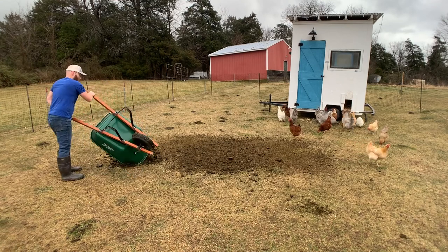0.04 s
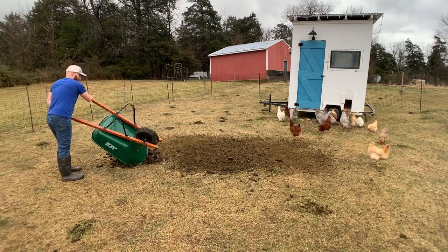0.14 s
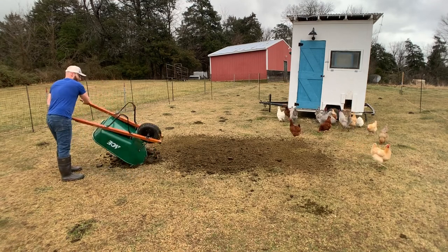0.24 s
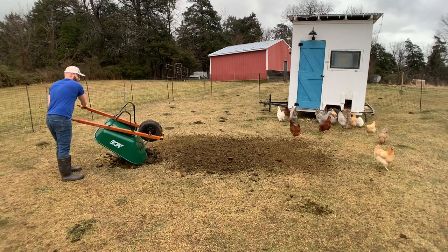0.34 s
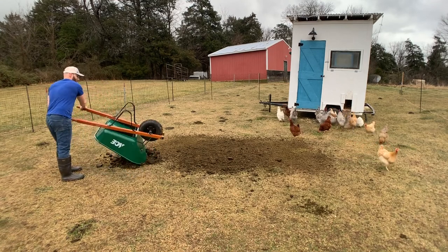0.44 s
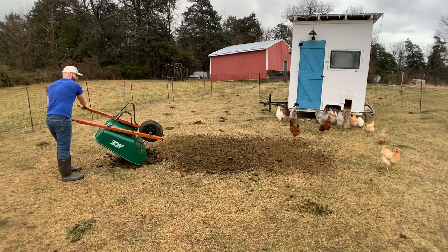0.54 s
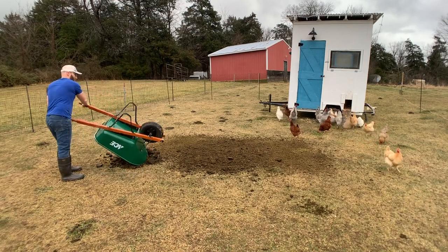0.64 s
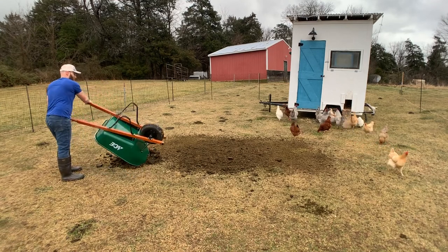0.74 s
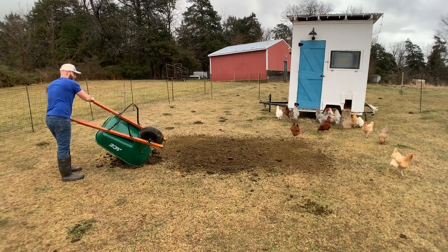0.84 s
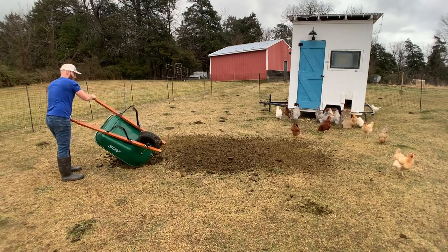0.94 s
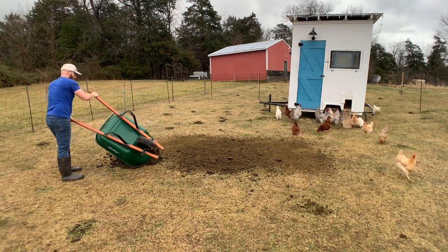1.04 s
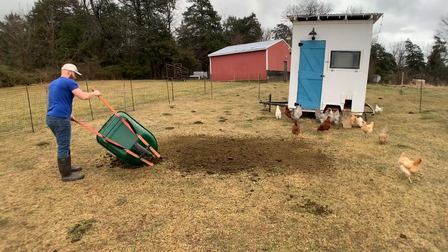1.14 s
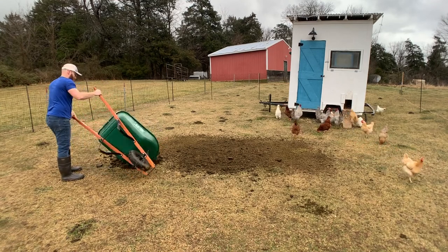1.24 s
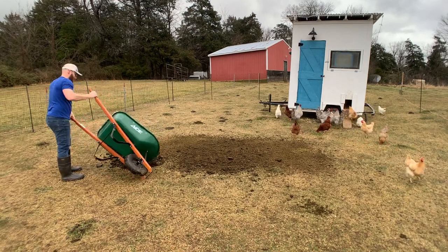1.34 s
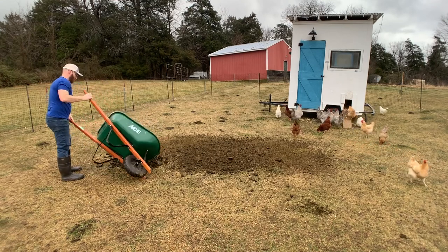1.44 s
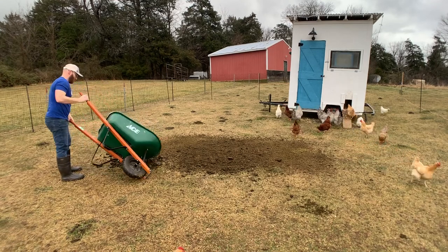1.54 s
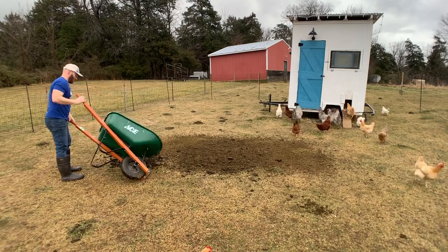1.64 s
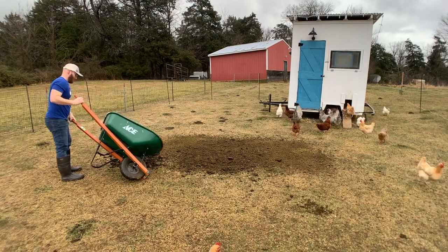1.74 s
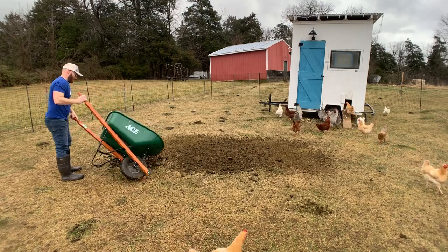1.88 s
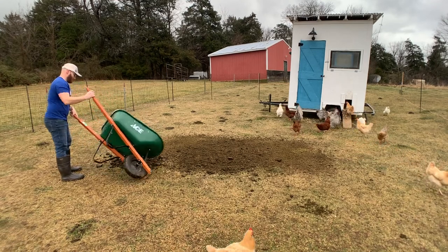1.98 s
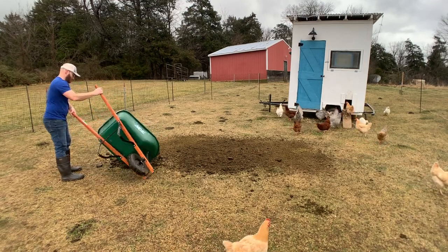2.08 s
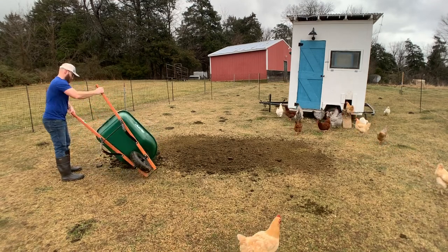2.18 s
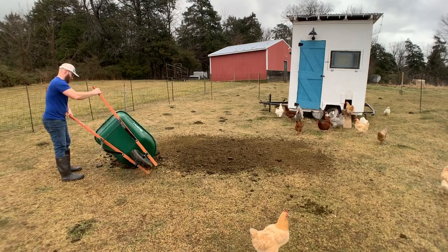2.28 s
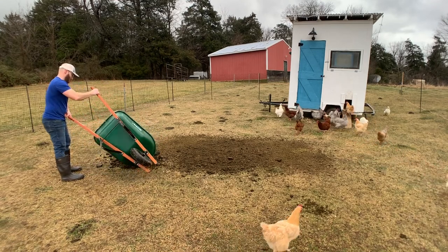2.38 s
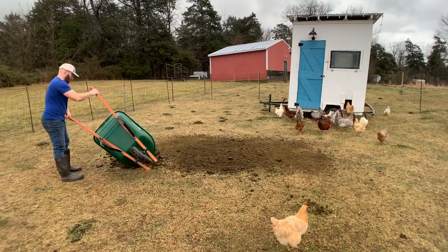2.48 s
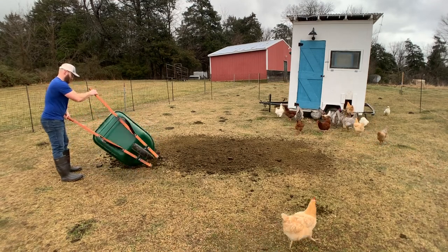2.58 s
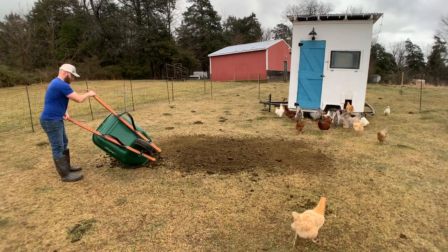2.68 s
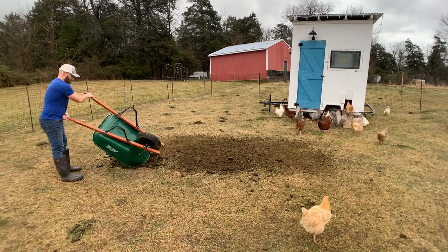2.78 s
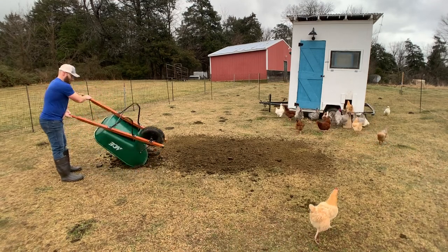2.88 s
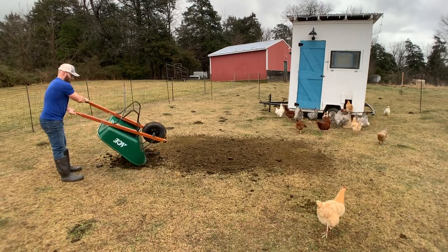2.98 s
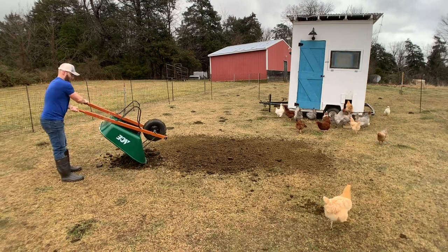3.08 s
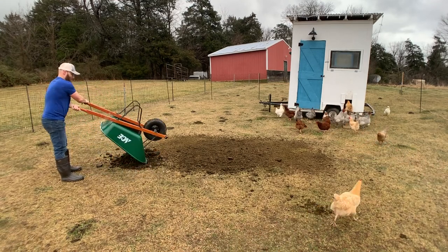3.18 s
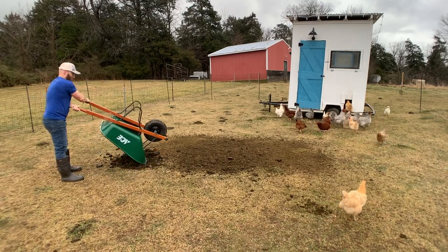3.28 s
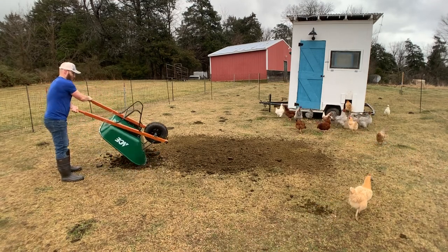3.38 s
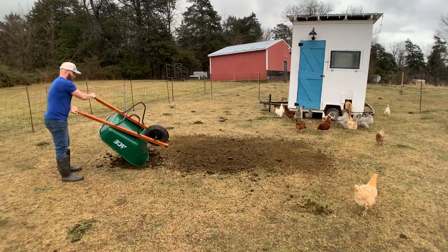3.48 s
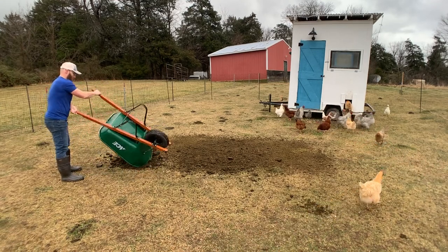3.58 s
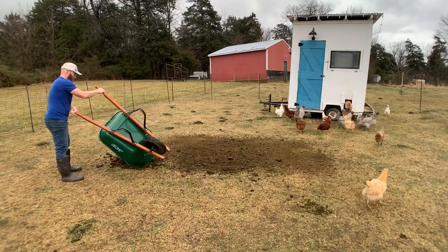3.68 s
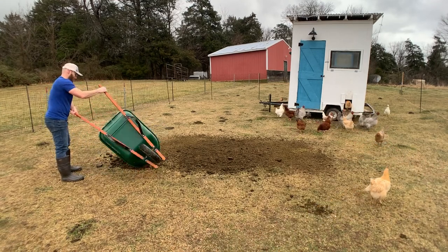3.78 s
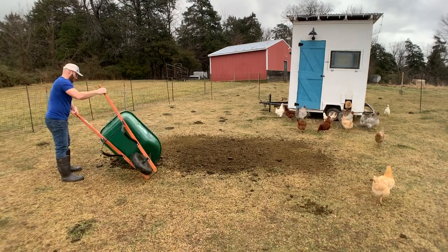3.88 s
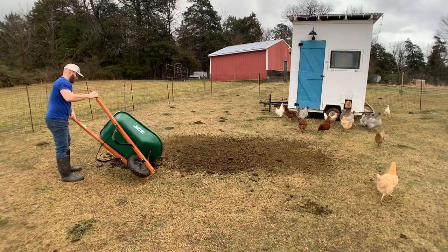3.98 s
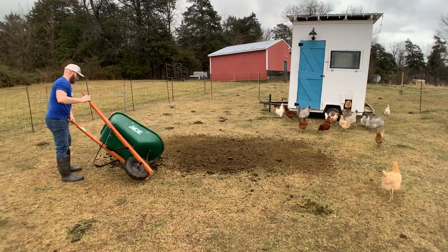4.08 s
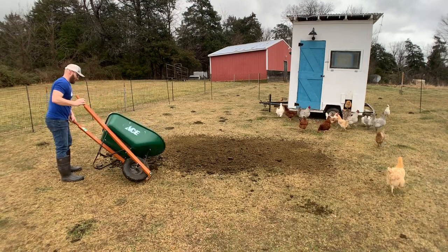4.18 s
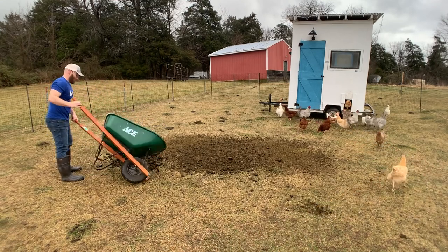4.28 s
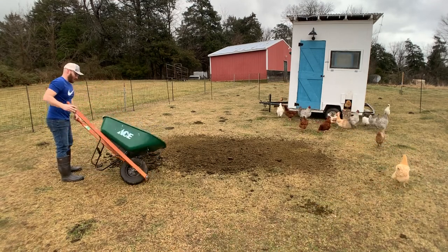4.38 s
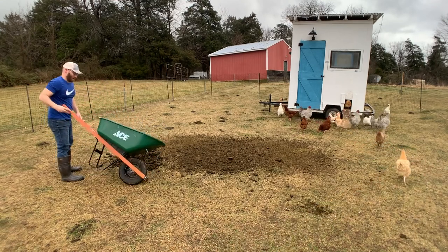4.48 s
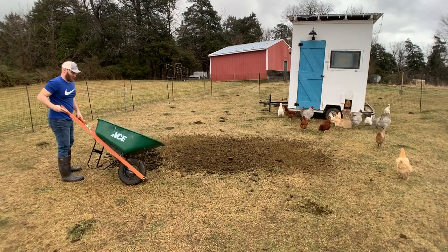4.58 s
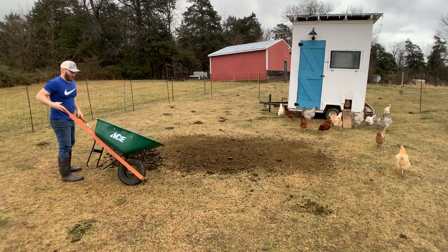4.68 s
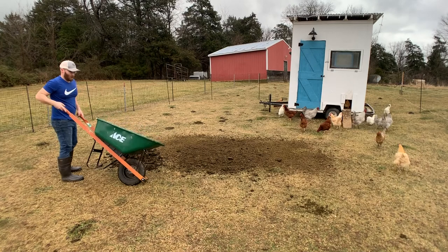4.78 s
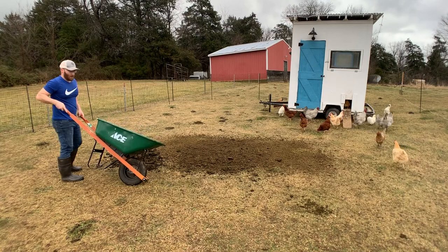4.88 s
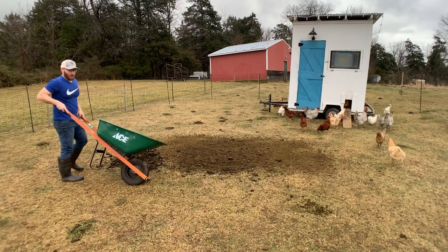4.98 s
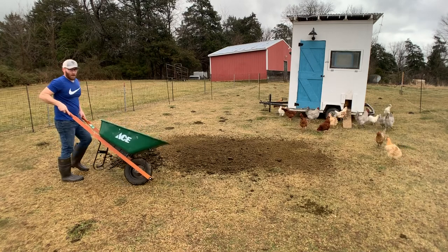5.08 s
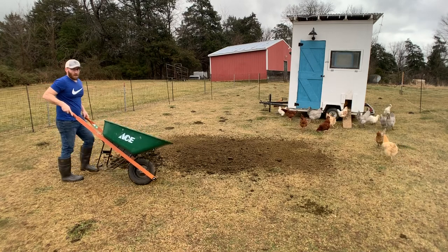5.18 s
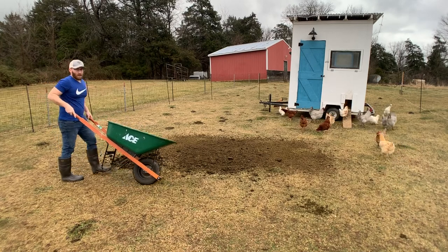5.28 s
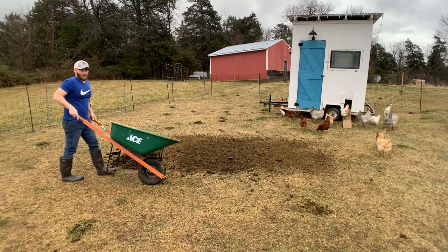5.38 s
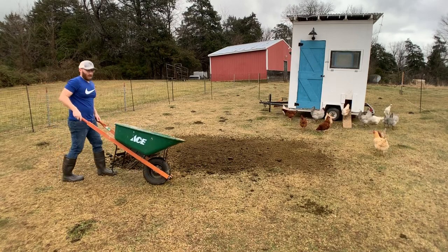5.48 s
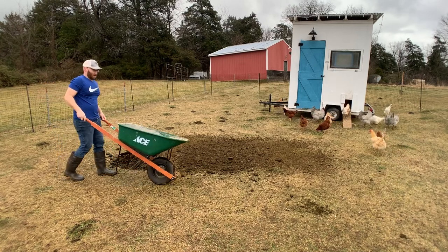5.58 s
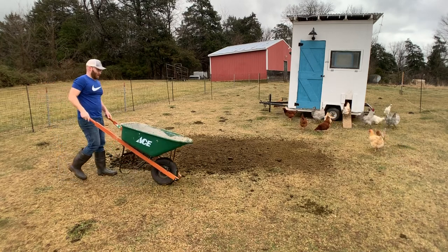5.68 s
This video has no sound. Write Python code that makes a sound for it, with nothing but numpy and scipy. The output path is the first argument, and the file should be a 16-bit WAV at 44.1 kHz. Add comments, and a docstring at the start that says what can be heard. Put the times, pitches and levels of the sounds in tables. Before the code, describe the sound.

A steel wheelbarrow is knocked and shaken over dry grass with hollow booms and rattles, while small birds peep in a quiet open yard.

```python
"""Open air hums and dry stalks crunch, then a steel barrow tray rolls on its rim and is knocked and shaken.
Each blow is a pop of a few cycles that drives decaying tray modes and a band-filtered wash of weaker ones.
Short sinking swings make the wobbles, inharmonic partials the clanks, and random grains the rattle and rustle.
Small birds and one hen are gliding harmonic tones; the air is filtered noise, partly alike on both sides."""
import sys
import numpy as np
from scipy import signal
from scipy.fft import rfft, irfft, next_fast_len
from scipy.io import wavfile

SR = 44100
rng = np.random.default_rng(int(sys.argv[2]) if len(sys.argv) > 2 else 0)


def to_wav(sig):
    """Store sig (one row per channel, or 1-D mono) as 16-bit WAV at the path in sys.argv[1].

    Samples outside -1..1 are clipped; the rate is SR.
    """
    pcm = np.clip(np.atleast_2d(sig), -1, 1) * 32767
    pcm = np.round(pcm).astype(np.int16)
    wavfile.write(sys.argv[1], SR, pcm.T)  # frames by channels


N = 252693
T = np.arange(N) / SR

# blows on the tray: (time [s], knock level before gain [dB], nominal knock pitch [Hz],
# knock length [cycles], shaking of the tray [dB])
BLOWS = [(0.37, -44, 1030, 2.5, -59), (0.375, -47.5, 1330, 5.4, -75), (0.564, -22, 816, 1.27, -47),
         (1.025, -28, 874, 0.91, -52), (1.394, -28.5, 880, 1.7, -32), (1.427, -27, 700, 4.2, -36),
         (1.448, -36, 623, 1.5, -35.5), (1.491, -20, 757, 0.96, -31), (1.506, -20.5, 395, 0.38, -47),
         (1.533, -20, 630, 0.83, -33.5), (1.54, -14, 425, 0.33, -40.5), (1.562, -28, 773, 0.9, -39),
         (1.613, -38, 494, 2.3, -39.5), (1.667, -38, 614, 0.85, -65), (2.229, -32.5, 818, 1.3, -43.5),
         (2.236, -36, 540, 1.5, -51), (2.282, -34, 527, 0.69, -43.5), (2.442, -38.5, 1020, 3, -47),
         (3.175, -12, 773, 1.2, -39.5), (3.207, -22.5, 676, 0.9, -51), (4.006, -13, 777, 2.36, -28.5),
         (4.0135, -4, 634, 0.42, -36.5), (4.027, -25, 865, 1.2, -29.5), (4.06, -24.5, 393, 1, -30),
         (4.072, -22.5, 844, 2.3, -29.5), (4.092, -16.5, 812, 0.99, -31), (4.118, -26.5, 617, 1.9, -37.5),
         (4.132, -27.5, 358, 0.74, -33.5), (4.147, -18.5, 846, 0.42, -34), (4.175, -23, 823, 0.84, -43),
         (4.205, -26, 517.5, 0.72, -34.5), (4.272, -33, 394, 0.68, -51), (4.336, -38.5, 578, 0.88, -52.5),
         (4.435, -36.5, 1050, 0.73, -41), (4.484, -7, 491, 0.59, -37.5), (4.491, -21.5, 307, 1.4, -41.5),
         (4.871, -47, 570, 0.72, -62.5)]
# braces and bolts striking the tray: (time [s], level before gain [dB], hollow low ring [dB],
# bright edge [dB], t60 below the extra damping at the top [s])
CLANKS = [(0.564, -55, 5, -6, .03), (1.025, -71, 14, -7, 0.027), (1.392, -36, 1.5, -6, 0.045),
          (1.411, -45.5, 6, -7, 0.085), (1.427, -39, 2.5, -7, 0.045), (1.446, -44, 1, 6.5, .03),
          (1.456, -44.5, -10, -7.5, 0.11), (1.4905, -34.5, 0, -1, 0.031), (1.508, -45.5, 0, -2, 0.053),
          (1.534, -41.5, -0.5, -16, 0.059), (1.555, -45, 1.5, -13, 0.049), (1.562, -51, 10, -12, 0.022),
          (1.657, -61, 6, -5, 0.046), (2.229, -62.5, 8, -4, 0.047), (2.282, -62, 9, 9, 0.03),
          (2.442, -52.5, -2, -8, 0.022), (3.175, -38.5, 2.5, 7.5, 0.024), (4.0055, -33, -4.5, 3.5, 0.079),
          (4.0105, -45, 11.5, -5, 0.024), (4.021, -33, -11, -3, 0.083), (4.029, -31.5, -6.5, 1, 0.048),
          (4.059, -39, 2.5, 3, .05), (4.080, -39.5, 3.5, -8, 0.065), (4.091, -32, -6.5, -3, 0.037),
          (4.118, -49.5, -2, -11, 0.032), (4.130, -35, -8, -10, 0.044), (4.147, -43.5, -2.5, -9, 0.077),
          (4.175, -48, 4.5, -21, 0.046), (4.433, -46, 3.5, -15.5, 0.026), (4.4835, -38.5, 0, 1, 0.028),
          (4.515, -64, -12, -14, .04)]
# colour of the sheet's countless weaker modes: (frequency [Hz], relative density [dB per Hz])
SHEET_COLOUR = [(45, -31), (75, -1.5), (120, 4), (230, 4.5), (330, -7), (550, -13.5), (800, -3.5),
                (1100, -24), (1500, -25.5), (2000, -47.5)]
# colour of bolts, braces and dirt rattling on steel: (frequency [Hz], relative density [dB per Hz])
CLATTER_COLOUR = [(700, -28.5), (1300, -14), (2200, 1), (2850, -3), (3600, -5), (4400, 5), (5500, 0.5),
                  (6800, -0.5), (8400, -17.5), (10300, -21.5), (12800, -28.5), (15000, -19)]
# colour of dry stalks: (frequency [Hz], relative density [dB per Hz])
STRAW_COLOUR = [(900, -20.5), (3000, 3.5), (4500, 3), (6600, 2), (8400, -9.5), (10500, -13), (15000, -22.5)]
BOOM_TOP_HZ = 280   # divides boom from ring in the tray, and rumble from hush in the air


def knocks(sag=0.044, sharp=1.056, gain_db=-3.0, rim_db=-13, rim_t60=0.15,
           clack_ratio=2, clack_db=-25, clack_cycles=1.6):
    """Impact transient: the struck spot pops at each blow, with a weaker, higher clack on top."""
    out = np.zeros(N)
    for s, db, hz, cycles, *_ in BLOWS:
        add(out, s, pop(db + gain_db, sharp * hz, cycles, sag))
        add(out, s, pop(db + clack_db, clack_ratio * hz, clack_cycles, sag))
    # the higher pops bounce between the rims for a moment
    quick = signal.sosfilt(signal.butter(2, 500, "high", fs=SR, output="sos"), out + 1e-18)
    return out + from_db(rim_db) * scatter(quick, rim_t60, channels=1)[0]


def wobbles(overtone_db=-15, sag=0.12):
    """Elastic recoil: the buckled sheet springs back in a few slow, lopsided swings of sinking pitch."""
    # (time [s], length [s], middle pitch [Hz], level of the fundamental before radiation [dB])
    swings = [(0.596, 0.018, 186, -38.5), (1.05, 0.027, 169.4, -36), (1.083, 0.022, 154, -36),
              (1.403, 0.015, 135, -24), (1.452, 0.025, 173.4, -26.5), (1.565, 0.026, 154, -23.5),
              (1.603, 0.014, 131, -23.5), (1.69, 0.017, 155, -33.5), (1.727, 0.014, 172, -32.5),
              (2.274, 0.019, 160, -40), (2.318, 0.18, 137, -41.5), (2.321, 0.075, 94, -34),
              (3.208, 0.021, 192, -28), (3.335, 0.078, 172.6, -48), (4.012, 0.02, 245, -19),
              (4.02, 0.036, 102.8, -10), (4.127, 0.048, 162.7, -20), (4.222, 0.04, 135, -28.5),
              (4.282, .016, 148.3, -29), (4.445, 0.0068, 131, -39), (4.526, 0.018, 145, -36),
              (4.82, 0.068, 107, -43)]
    out = np.zeros(N)
    for s, length, hz, db in swings:
        u = np.linspace(0, 1, max(round(length * SR), 8))
        phase = 2 * np.pi * np.cumsum(hz * (1 + sag * (.5 - u))) / SR
        envelope = 2 * np.sqrt(u * (1 - u))
        add(out, s, from_db(db) * envelope * (np.sin(phase) + from_db(overtone_db) * np.cos(2 * phase)))
    return out


def chatter(clatter_db, count=3, within_s=0.045, level_db=-2.5, fall_db_per_s=125,
            low_hz=490, high_hz=1106, cycles=1.0, sag=0.016):
    """Repeated contact: the loose tray pops on its frame after each blow, weaker the later it does so."""
    out = np.zeros(N)
    for blow, db, draws in zip(BLOWS, clatter_db, rng.random((len(BLOWS), count, 2))):
        for when, pitch in draws:
            delay = when * within_s
            hz = low_hz * (high_hz / low_hz) ** pitch
            add(out, blow[0] + delay, pop(db + level_db - fall_db_per_s * delay, hz, cycles, sag))
    return out


def tray(boom_db, ring_db, gain_db=-5.5, uneven_db=3.0, detune=.016, stretch=0.024, settle_s=0.048):
    """Modal superposition: each blow drives every mode anew; the stretched sheet starts sharp and settles."""
    # modes of the tray: (frequency [Hz], relative level [dB], t60 [s])
    tray_modes = [(78.9, -14, 1.5), (93.8, -1, 1.09), (108.1, -3.5, 0.83), (119.6, -12.5, 1.1),
                  (137.2, 0.5, 1.07), (166.9, -3.5, 0.92), (186.3, -1, 0.73), (190.9, -2, 1.06),
                  (250.7, -13, 0.92), (267.2, -2, 0.27), (274, 4, 0.063), (284.7, -12, 0.62),
                  (332, -19, 0.22), (394.3, -4.5, 0.65), (448, -17, 0.7), (477, -12, 0.73),
                  (563, -3.5, 0.26), (641, -8, 0.49), (669, 0, 0.13), (750, -23, 0.18), (800, -6, 0.36),
                  (808, -17, 0.14), (907, -1, 0.12), (1085, -11, 0.18), (1160, -11, 0.078),
                  (1258, -12, 0.15), (1370, -17.5, 0.35)]
    out, t = np.zeros(N), T[:SR * 3 // 4]
    mode_hz, mode_db, _ = np.transpose(tray_modes)
    fades = np.array([swell(t, spread_time(hz), t60) for hz, _, t60 in tray_modes], np.float32)
    phase = (2 * np.pi * (t + stretch * settle_s * (1 - np.exp(-t / settle_s)))).astype(np.float32)
    draws = rng.standard_normal((len(BLOWS), 3, len(tray_modes)))
    for blow, (strength, sign, tuning), boom, ring in zip(BLOWS, draws, boom_db, ring_db):
        drive_db = np.where(mode_hz < BOOM_TOP_HZ, boom, ring)
        drive_db = drive_db + softness_db(mode_hz, blow[2]) + uneven_db * strength
        tuned_hz = (mode_hz * (1 + detune * tuning)).astype(np.float32)
        waves = np.sin(np.outer(tuned_hz, phase))
        add(out, blow[0], (np.sign(sign) * from_db(mode_db + drive_db + gain_db)) @ (fades * waves))
    return out


def flex(x, bend=0.02557, bend_per_s=14, throb_db=2.5):
    """Parametric modulation: the tray twists on its handles, so pitch wanders and decay is uneven."""
    knots = rng.standard_normal(1024)
    lead_s = bend / bend_per_s * np.interp(T * bend_per_s, np.arange(len(knots)), knots)
    return np.interp(T + lead_s, T, x) * flicker(per_s=35, depth_db=throb_db)


def sheet(boom_db, ring_db, gain_db=-26):
    """High modal density: crowded weak modes blur into half-octave noise bands, each with its own decay."""
    # how long the weaker modes last: (frequency [Hz], t60 [s])
    sheet_t60 = [(80, 0.88), (200, 0.37), (400, 0.53), (900, 0.2), (2000, 0.45)]
    out, edges, white = 0, 45 * 2 ** np.arange(0, 6, .5), rng.standard_normal((2, N))
    for k, (low, high) in enumerate(zip(edges, edges[1:])):
        hz = np.sqrt(low * high)
        band_filter = signal.butter(2, [low, high], "band", fs=SR, output="sos")
        band = rms_one(signal.sosfilt(band_filter, white[k % 2]))
        drive_db = (boom_db if hz < BOOM_TOP_HZ else ring_db) + softness_db(hz, np.array(BLOWS)[:, 2])
        envelope = after_blows(drive_db, spread_time(hz), at_hz(sheet_t60, hz))
        out = out + band * envelope * np.sqrt(high - low) * from_db(at_hz(SHEET_COLOUR, hz) + gain_db)
    return out


def roll(centre_s=0.29, half_width_s=0.22, level_db=-52.5):
    """Rolling excitation: the rim turning over on the ground stirs the sheet softly."""
    return from_db(level_db) * bump(centre_s, half_width_s) * noise(SHEET_COLOUR)


def clanks(gain_db=-1, uneven_db=3, top_damping=0.6, partial_count=64):
    """Inharmonic impact: each steel contact sets off its own partials, and the highest die first."""
    # pitches over which the partials spread: (frequency [Hz], relative level [dB])
    clank_colour = [(1100, 14), (1600, 5), (2200, 7.5), (2900, 0), (3600, -7), (4400, 2), (5500, 5),
                    (6600, 1.5), (8200, -15), (10300, -5), (12800, -30.5), (15200, -6)]
    out, t = np.zeros(N), T[:SR // 8].astype(np.float32)
    edges = np.linspace(1100, 15900, partial_count + 1)
    draws = rng.random((len(CLANKS), 3, partial_count))
    for (s, db, hollow_db, bright_db, t60), (place, strength, turn) in zip(CLANKS, draws):
        hz = edges[:-1] + place * np.diff(edges)
        gains = from_db(at_hz(clank_colour, hz) + uneven_db * (2 * strength - 1))
        low = np.interp(hz, [2500, 3300], [1, 0])
        top = np.interp(hz, [7000, 9000], [0, 1])
        level_db = db + gain_db + low * hollow_db + top * bright_db
        gains = gains / np.linalg.norm(gains) * np.sqrt(2) * from_db(level_db)
        decay = np.log(1000) / t60 * (1 + top_damping * top)
        speed, start, decay = np.float32([2 * np.pi * hz, 2 * np.pi * turn, decay])[:, :, None]
        partials = np.sin(speed * t + start) * np.exp(-decay * t)
        add(out, s, gains @ partials * (1 - np.exp(-t / 0.00024)))   # soft onset
    return out


def clatter(clatter_db, rattle_t60=0.12, rattle_db=-11.0, steel_db=-8, steel_t60=0.11, fittings_db=-5):
    """Granular excitation and resonance: dirt rattles in clumps after blows; fittings ring after clanks."""
    # modes of the bolts and braces: (frequency [Hz], relative level [dB], t60 [s])
    fitting_modes = [(1712, -29, .25), (2242, -26, .25), (2640, -30, .14), (3080, -32, .12),
                     (3870, -30, .14), (4591, -28, .22), (5335, -26, .2), (6051, -20, .2), (6320, -23, .12),
                     (6407, -19, .14)]
    touches = grains(CLATTER_COLOUR, per_s=450, spread_db=6) * flicker(per_s=110, depth_db=6)
    rattle = touches * after_blows(clatter_db + rattle_db, 0.013, rattle_t60)
    steel = from_db(steel_db) * scatter(rattle, steel_t60, channels=1)[0]
    rings, t = np.zeros(N), T[:SR // 2]
    shapes = np.array([from_db(db) * swell(t, 0.0018, t60) * np.sin(2 * np.pi * hz * t)
                       for hz, db, t60 in fitting_modes])
    draws = rng.standard_normal((len(CLANKS), len(fitting_modes)))
    for (s, db, *_), strengths in zip(CLANKS, draws):
        add(rings, s, from_db(db + fittings_db) * strengths @ shapes)
    return rattle + steel + rings


def clinks(clatter_db, count=8, within_s=.045, gain_db=-6, fall_db_per_s=216,
           low_hz=997, high_hz=6740, cycles=2.4, uneven_db=4):
    """Discrete impacts: crumbs and bolts hit the steel after each blow, each with its own short ping."""
    out = np.zeros(N)
    for blow, db, draws in zip(BLOWS, clatter_db, rng.random((len(BLOWS), count, 3))):
        for when, pitch, size in draws:
            delay = when * within_s
            hz = low_hz * (high_hz / low_hz) ** pitch
            level_db = db + gain_db + at_hz(CLATTER_COLOUR, hz) + uneven_db * (2 * size - 1)
            add(out, blow[0] + delay, pop(level_db - fall_db_per_s * delay, hz, cycles, 0))
    return out


def straw(soil_under_stalks_db=-6):
    """Granular friction: short swells of random grains make crumbling soil and crackling dry stalks."""
    # colour of crumbling soil: (frequency [Hz], relative density [dB per Hz])
    soil_colour = [(130, -0.5), (300, 3.5), (900, 1.5), (1400, 1.5), (2200, 2), (3200, -2), (4400, -1.5),
                   (5500, -19.5), (9000, -35)]
    # stalks crushed or snapped under the rim or a boot: (centre [s], half-width to 1/e^2 [s], level [dB])
    crunches = [(0.165, 0.015, -71), (0.245, 0.14, -73.5), (0.247, .006, -74), (0.315, .015, -84),
                (1.222, 0.017, -72), (1.391, 0.021, -61), (1.959, 0.053, -72.5), (2.056, 0.0088, -64.5),
                (2.222, .02, -67), (2.272, 0.01, -65), (2.528, 0.0035, -63), (2.759, 0.0043, -68),
                (2.812, 0.0025, -63.5), (3.3, 0.1, -73), (3.627, .005, -76.5), (3.808, 0.016, -70.5),
                (3.927, 0.013, -66), (4.005, 0.013, -57), (4.292, 0.16, -70.5), (4.975, 0.052, -78.5),
                (5.429, 0.0031, -72.5), (5.5, 0.023, -70.5), (5.61, .07, -83)]
    # soil sliding off the tray or shifting on the ground: (centre [s], half-width to 1/e^2 [s], level [dB])
    soil_slides = [(0.606, 1, -70), (1.762, 0.059, -63), (2.142, 0.042, -64), (2.202, 0.022, -66),
                   (2.597, 0.027, -65), (5.56, 0.17, -72)]
    stalks = sum(from_db(db) * bump(s, width) for s, width, db in crunches)
    slides = sum(from_db(db) * bump(s, width) for s, width, db in soil_slides)
    soil = slides + from_db(soil_under_stalks_db) * stalks
    clumps = flicker(per_s=45, depth_db=3)
    crumbling = soil * grains(soil_colour, per_s=1500, spread_db=1.0)
    crackling = stalks * grains(STRAW_COLOUR, per_s=4700, spread_db=-2.0)
    return clumps * (crumbling + crackling)


def ports(x):
    """Interaural-style cues: sound from the left front reaches two ports with pitch-dependent level and phase."""
    # (frequency [Hz], left minus right level [dB])
    port_balance = [(60, -0.5), (260, 0.5), (600, 3.5), (830, 10.5), (1000, 0.5), (1200, -5.5), (1600, -1),
                    (3000, -1), (4400, 4.5), (6000, -6), (9000, 1), (15000, 1.5)]
    # (frequency [Hz], phase by which the left leads [rad])
    port_phase = [(40, 0), (250, 0.29), (650, 0.94), (800, -1.66), (1020, 1.41), (1800, 1.15), (2400, 1.77),
                  (2850, 4), (4500, 4.5), (5700, 4.5), (6500, 0), (7500, -1), (9300, -6.5), (10500, -4),
                  (15200, -11.5)]
    size = next_fast_len(N + 4096)
    hz = np.fft.rfftfreq(size, 1 / SR) + 1
    sides = np.array([[.5], [-.5]])
    gains = from_db(sides * at_hz(port_balance, hz))
    gains = gains / np.sqrt(np.mean(gains ** 2, axis=0))
    turns = np.exp(1j * sides * at_hz(port_phase, hz))
    return irfft(rfft(x, size) * gains * turns, size)[:, :N]


def yard(x, near_db=-9, near_t60=0.13, far_db=-22, far_t60=1.0):
    """Diffuse reflection: returns from the ground nearby and from the buildings and trees."""
    return from_db(near_db) * scatter(x, near_t60) + from_db(far_db) * scatter(x, far_t60)


def hen(direct_db=-1, scatter_db=-13):
    """Harmonic source with level panning: one soft, low cluck, a little to the right."""
    # (time [s], length [s], start [Hz], middle [Hz], end [Hz], level before path gains [dB])
    clucks = [(4.907, .072, 272, 246, 266, -52)]
    # (multiple of the fundamental, relative level [dB])
    cluck_harmonics = [(1, -4), (2, 0.5), (3, -6), (4, -20.5), (5, -21)]
    out = np.zeros(N)
    for s, length, start_hz, middle_hz, end_hz, db in clucks:
        note = call(length, start_hz, middle_hz, end_hz, cluck_harmonics, waver=0.015)
        add(out, s, from_db(db) * note * np.sqrt(np.hanning(len(note))))
    direct = out * from_db(direct_db + np.array([[-2], [1]]))
    return direct + from_db(scatter_db) * scatter(out, 0.12)


def birds(direct_db=-5.5, scatter_db=-11, scatter_t60=0.18):
    """Frequency-modulated tones: far peeps, pure or raspy, scattered by the trees differently for each side."""
    # (time [s], length [s], start [Hz], middle [Hz], end [Hz], level before path gains [dB], rasp [0-1])
    peeps = [(0.753, 0.07, 4100, 3980, 3640, -76.5, .7), (0.988, 0.041, 3620, 4030, 3350, -62.5, 0.5),
             (1.589, 0.12, 3620, 3400, 3290, -67.5, 0.3), (2.237, 0.35, 3560, 3366, 3150, -66.5, 0.1),
             (2.338, 0.035, 3500, 3620, 3830, -74, .2), (2.542, 0.032, 3680, 3960, 3500, -63, 0.5),
             (2.578, .028, 2470, 2410, 2110, -61, 1), (2.583, .03, 1870, 1820, 1700, -64.5, 1),
             (2.621, 0.05, 4580, 4250, 3430, -69.5, 0.7), (2.627, 0.094, 2480, 2600, 2500, -76, 0.3),
             (2.791, 0.048, 3720, 3860, 4160, -66, 0.5), (2.872, 0.037, 3430, 3830, 3200, -59.5, 0.84),
             (2.88, 0.043, 4150, 4040, 3540, -65.5, 0.5), (2.918, 0.03, 4920, 4700, 4200, -64.5, .7),
             (3.033, 0.033, 3920, 3950, 3700, -76, .5), (3.197, 0.056, 3950, 3870, 4180, -62.5, 0.3),
             (3.526, 0.034, 5330, 5070, 5000, -78, 0), (3.79, 0.075, 4000, 3450, 2370, -84, .4),
             (3.942, 0.04, 4350, 4070, 3460, -67.5, .1), (4.584, 0.084, 3480, 3490, 3620, -73, 0.2),
             (4.742, 0.032, 4320, 4510, 4460, -75, 0.2), (5.023, 0.03, 4670, 4450, 4440, -74, 0.26),
             (5.082, 0.037, 3550, 3670, 3250, -64, 0.15), (5.106, 0.027, 4360, 4045, 3600, -67.5, 0.6),
             (5.24, .035, 2180, 2250, 2000, -71, 0.73), (5.314, 0.042, 3950, 3930, 3650, -65, 1),
             (5.64, 0.035, 1960, 1940, 1980, -64.5, 0.2)]
    # (multiple of the fundamental, relative level [dB])
    peep_harmonics = [(1, 0), (2, -22)]
    out = np.zeros(N)
    for s, length, start_hz, middle_hz, end_hz, db, rasp in peeps:
        peep = call(length, start_hz, middle_hz, end_hz, peep_harmonics, waver=0.005, rasp=rasp, scoop=0.066)
        add(out, s, from_db(db) * peep)
    return from_db(direct_db) * out + from_db(scatter_db) * scatter(out, scatter_t60)


def call(length, start_hz, middle_hz, end_hz, harmonics, waver, rasp=0, scoop=0,
         scoop_s=0.0088, rasp_per_s=460, rasp_swing=0.088, rasp_depth_db=5):
    """Phase integration: a note glides along an unsteady arc; scoop starts it flat, rasp makes it flutter."""
    u = np.linspace(0, 1, max(round(length * SR), 8))
    arc = np.polyfit([0, .5, 1], [start_hz, middle_hz, end_hz], 2)
    hz = np.polyval(arc, u) * (1 - scoop * np.exp(-u * length / scoop_s))
    knots = rng.standard_normal((2, 256))
    unsteady, slip = (np.interp(u * length * 300, np.arange(256), row) for row in knots)
    flutter = rasp * rasp_swing * np.sin(2 * np.pi * rasp_per_s * length * u + 2 * slip)
    phase = 2 * np.pi * np.cumsum(hz * (1 + waver * unsteady + flutter)) / SR
    # rises and falls within 30 ms at most
    loudness = 1.2 * np.sqrt(np.minimum(1, np.minimum(u, 1 - u) * length / .03))
    loudness = loudness * from_db(rasp * rasp_depth_db * slip)
    return loudness * sum(from_db(db) * np.sin(k * phase) for k, db in harmonics)


def grass(level_db=-83):
    """Sparse random impulses: dry grass stirs faintly all the time, in uneven patches of ticks."""
    ticks = grains(STRAW_COLOUR, per_s=500, spread_db=5)
    return from_db(level_db) * ticks * flicker(per_s=22, depth_db=6)


def air(rumble_db=-57):
    """Partial coherence: far rumble, mostly alike on both sides, under a diffuse hush of trees."""
    # colour of open air: (frequency [Hz], relative density [dB per Hz])
    air_colour = [(20, -26), (45, -2), (70, -0.5), (120, -1), (190, -15), (300, -20), (480, -24),
                  (800, -13), (1050, -18.5), (1500, -25.5), (2600, -38), (4000, -42.5), (6800, -42.5),
                  (8400, -64), (10500, -40.5), (16000, -65.5)]
    # (frequency [Hz], left-right correlation [-1 to 1])
    air_likeness = [(60, 0.98), (130, 0.8), (290, 0.76), (640, 0.29), (1400, -0.64), (3100, 0.18),
                    (15000, 0.079)]
    # (time [s], level of the hush [dB])
    hush_levels = [(0, -62), (.3, -62.5), (.6, -65), (2.2, -64), (3.7, -66), (5.1, -65.5), (5.45, -64)]
    hz = np.fft.rfftfreq(N, 1 / SR) + 1
    alike = np.clip(at_hz(air_likeness, hz), -1, 1)
    mid, side = rfft(rng.standard_normal((2, N))) * from_db(at_hz(air_colour, hz))
    both = np.sqrt(1 + alike) * mid + np.sqrt(1 - alike) * side * [[1], [-1]]
    low = hz < BOOM_TOP_HZ
    rumble = rms_one(irfft(both * low, N)) * from_db(rumble_db)
    hush = rms_one(irfft(both * ~low, N)) * from_db(np.interp(T, *np.transpose(hush_levels)))
    return rumble + hush


def pop(db, hz, cycles, sag):
    """Dispersion: a few cycles, falling in pitch when sag > 0 as the fast bending waves arrive first."""
    t = T[:SR // 10]
    age = t * hz / cycles
    return from_db(db) * age * np.exp(1 - age) * np.sin(2 * np.pi * np.cumsum(hz / (1 + sag * age)) / SR)


def swell(t, rise_s, t60):
    """Build-up and exponential decay: vibration spreads over the steel, then dies away."""
    return (1 - np.exp(-t / rise_s)) ** 2 * from_db(-60 * t / t60)


def spread_time(hz, at_100_hz_s=0.0014):
    """Dispersion: bending waves are slower at low pitch, so the boom builds later than the ring."""
    return at_100_hz_s * np.sqrt(100 / hz)


def softness_db(hz, knock_hz, reach=1.39, softest_hz=400):
    """Contact time: a dull, slow contact cannot drive the modes far above its own pitch."""
    return -10 * np.log10(1 + (hz / (reach * np.maximum(knock_hz, softest_hz))) ** 4)


def after_blows(levels_db, rise_s, t60):
    """Incoherent addition: the envelope left by all the blows is the root of their summed powers."""
    power, shape = np.zeros(N), swell(T[:SR], rise_s, t60) ** 2
    for blow, db in zip(BLOWS, levels_db):
        add(power, blow[0], from_db(db) ** 2 * shape)
    return np.sqrt(power)


def scatter(x, t60, channels=2):
    """Diffuse response: convolve with decaying noise of unit energy, drawn anew for each channel."""
    t = T[:SR // 2]
    cloud = rng.standard_normal((channels, len(t))) * from_db(-60 * t / t60)
    cloud /= np.linalg.norm(cloud, axis=1, keepdims=True)
    return signal.fftconvolve(x[None], cloud, axes=1)[:, :N]


def grains(spectrum, per_s, spread_db):
    """Filtered shot noise: tiny contacts of uneven size at random moments, with a given colour; rms 1."""
    size = next_fast_len(N)
    born = rng.random(size) < per_s / SR
    sizes = from_db(spread_db * np.minimum(rng.exponential(1, size), 3)) * rng.choice([-1, 1], size)
    hz = np.fft.rfftfreq(size, 1 / SR) + 1
    return rms_one(irfft(rfft(born * sizes) * from_db(at_hz(spectrum, hz)), size)[:N])


def noise(spectrum):
    """Spectral shaping: steady noise of a given colour, rms 1."""
    size = next_fast_len(N)
    hz = np.fft.rfftfreq(size, 1 / SR) + 1
    return rms_one(irfft(rfft(rng.standard_normal(size)) * from_db(at_hz(spectrum, hz)), size)[:N])


def flicker(per_s, depth_db):
    """Random amplitude modulation: a gain of mean power 1 with per_s random turning points a second."""
    knots = rng.standard_normal(16384)
    return rms_one(from_db(depth_db * np.interp(T * per_s, np.arange(len(knots)), knots)))


def bump(s, half_width_s):
    """Gaussian envelope: a smooth swell centred on time s, down to 1/e^2 at the half-width."""
    return np.exp(-2 * ((T - s) / half_width_s) ** 2)


def from_db(db):
    """Logarithmic level: decibels to amplitude gain."""
    return 10 ** (np.asarray(db) / 20)


def rms_one(x):
    """Power normalisation: scale to unit mean power."""
    return x / np.sqrt(np.mean(x ** 2) + 1e-20)


def at_hz(points, hz):
    """Logarithmic pitch: read a table on a log-frequency axis."""
    return np.interp(np.log(hz), np.log(np.array(points)[:, 0]), np.array(points)[:, 1])


def add(track, s, sound):
    """Linear superposition: mix a sound into a track from time s on."""
    start = max(round(s * SR), 0)
    track[start:start + len(sound)] += sound[:N - start]


def scene():
    """Common excitation: how hard a blow shakes the tray sets boom, ring and clatter; the yard surrounds it."""
    _, knock_db, _, _, boom_db = np.transpose(BLOWS)
    # the higher modes are driven partly by the knock, partly by the shaking
    ring_db = -1 + boom_db + 0.26 * (knock_db - boom_db)
    # loose parts hardly stir at a light blow: 1.78 dB of clatter per dB of shaking
    clatter_db = -39 + 1.78 * (boom_db + 33.5)
    pops = knocks() + wobbles() + chatter(clatter_db)
    # the tray is too small to push much air at low pitch
    radiation = signal.butter(3, 108.5, "high", fs=SR, output="sos")
    pops = signal.sosfilt(radiation, pops + 1e-18)
    body = pops + flex(tray(boom_db, ring_db)) + sheet(boom_db, ring_db) + roll()
    bright = clanks() + clatter(clatter_db) + clinks(clatter_db) + straw()
    barrow = ports(body + bright) + yard(bright)
    return barrow + yard(grass(), near_db=-2.5) + birds() + hen() + air()


def record(dry):
    """Band limitation: the deepest rumble and the top are cut."""
    lean = signal.sosfilt(signal.butter(2, 30, "high", fs=SR, output="sos"), dry)
    return signal.sosfilt(signal.ellip(10, .1, 80, 15900, fs=SR, output="sos"), lean)


dry = scene()
out = record(dry)
to_wav(out)
```